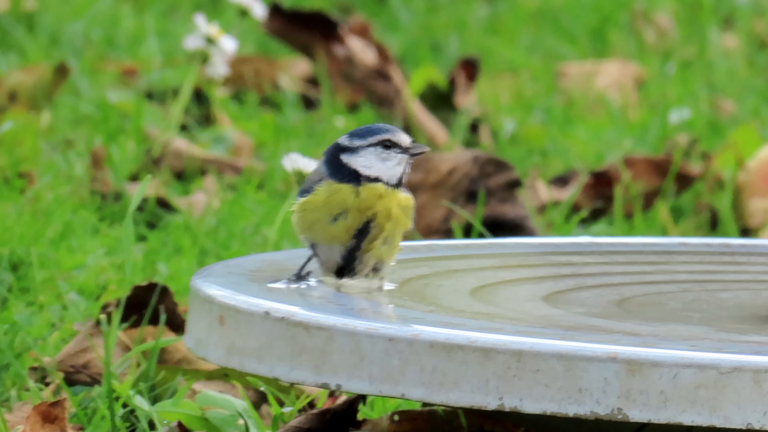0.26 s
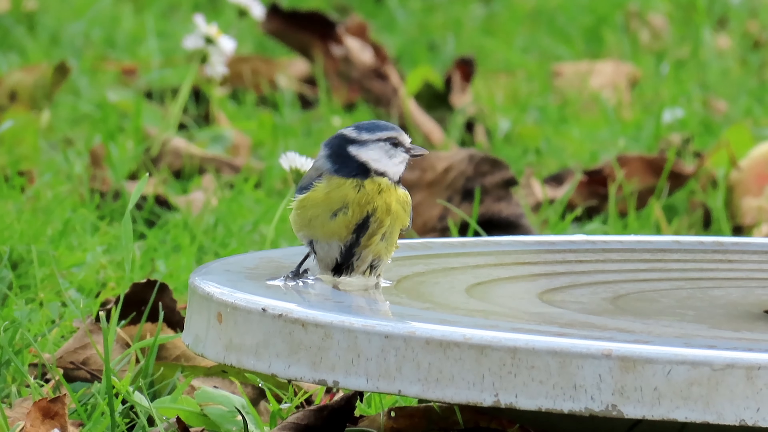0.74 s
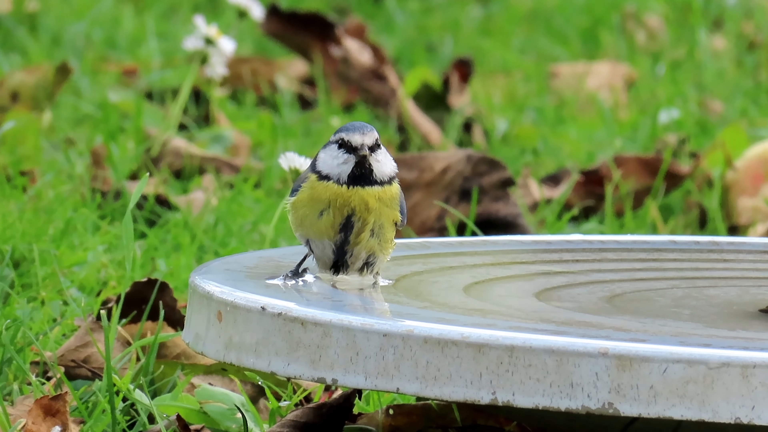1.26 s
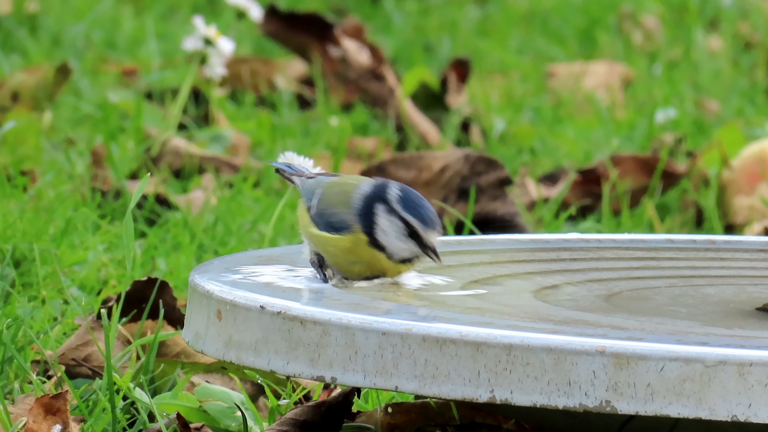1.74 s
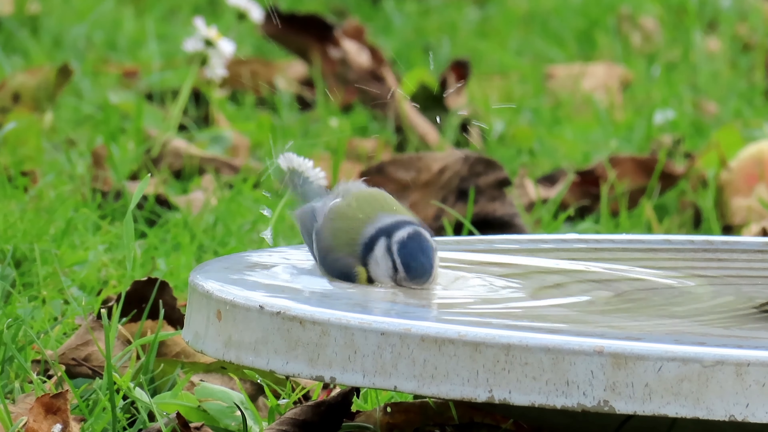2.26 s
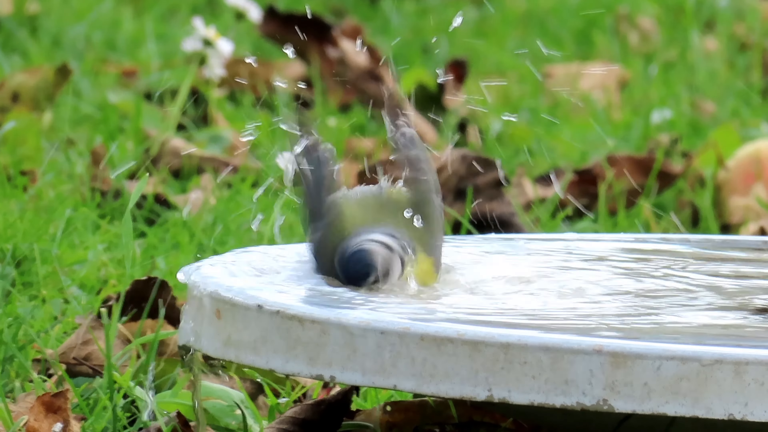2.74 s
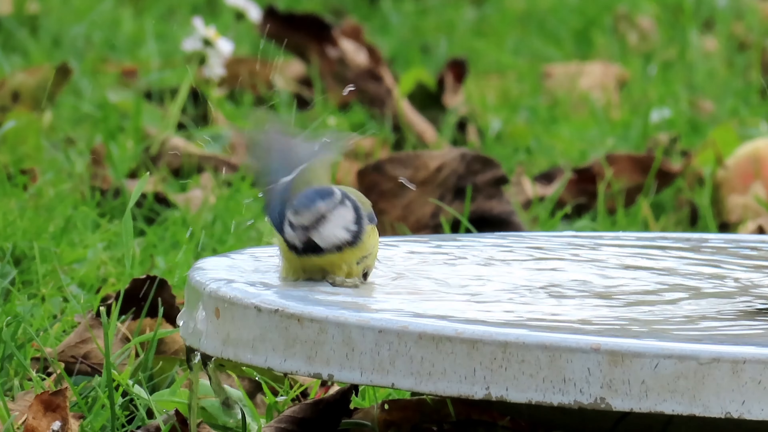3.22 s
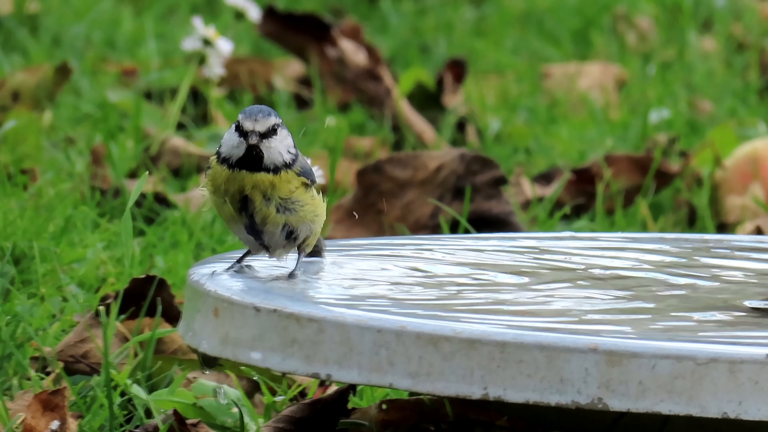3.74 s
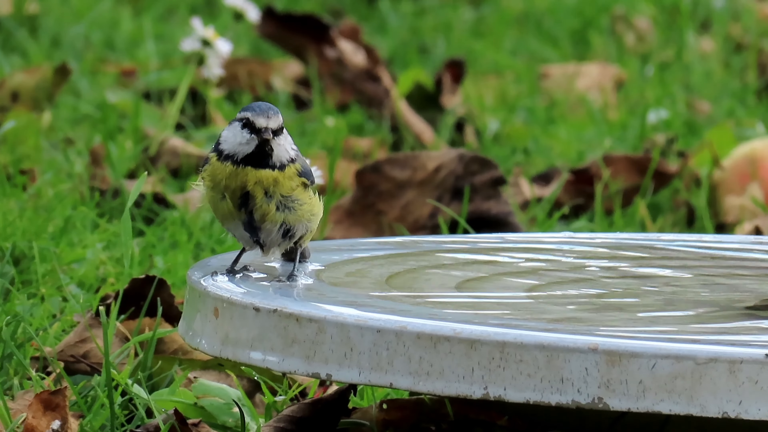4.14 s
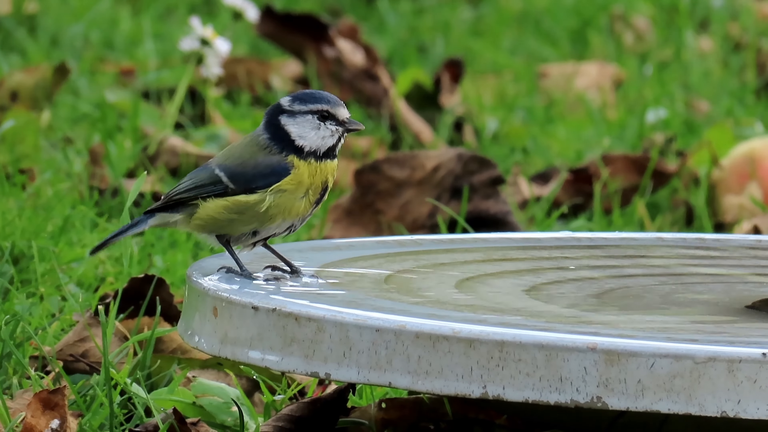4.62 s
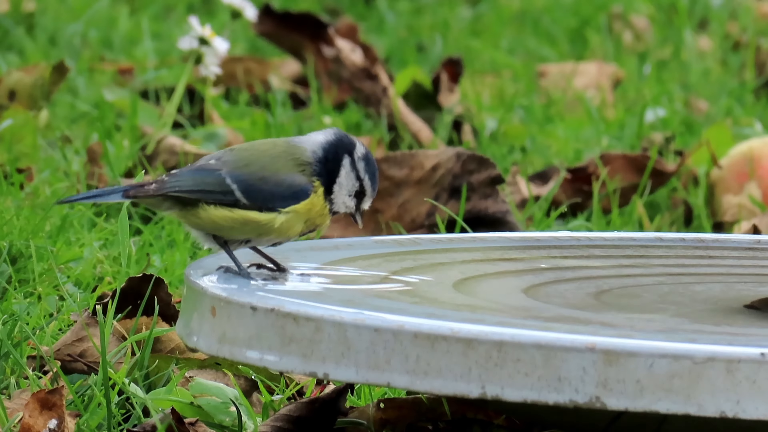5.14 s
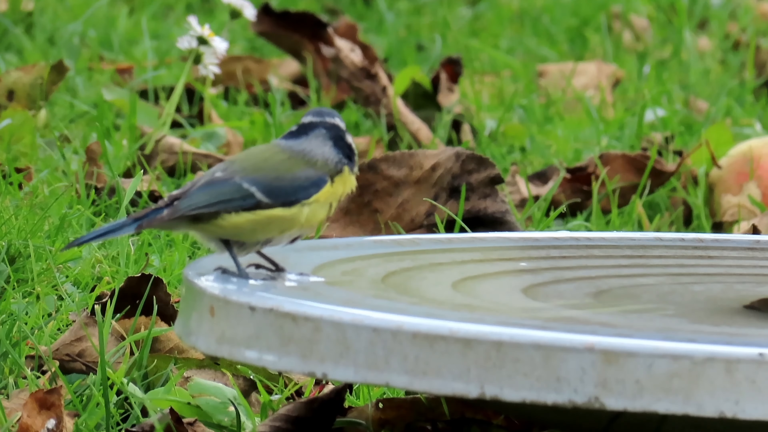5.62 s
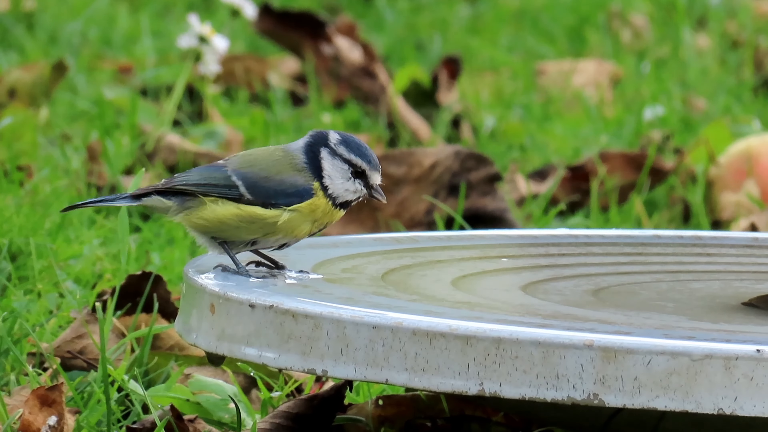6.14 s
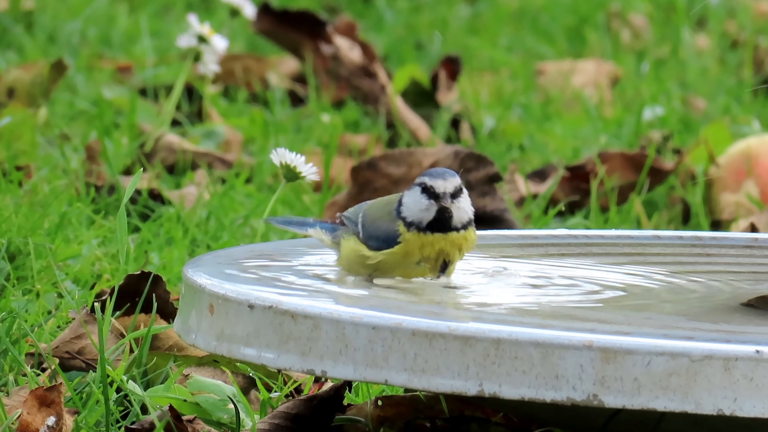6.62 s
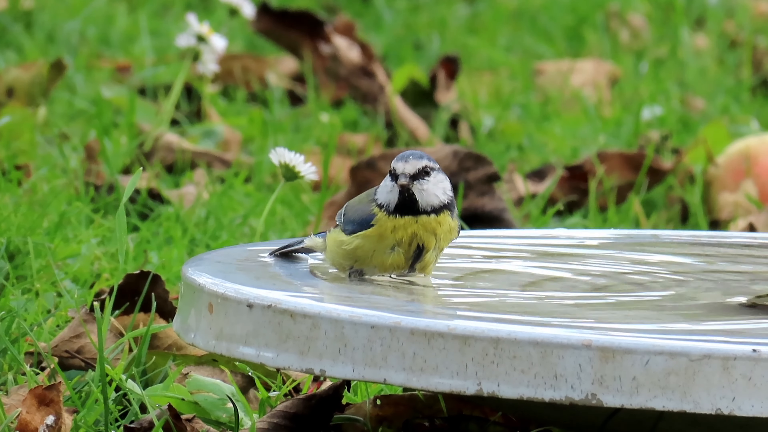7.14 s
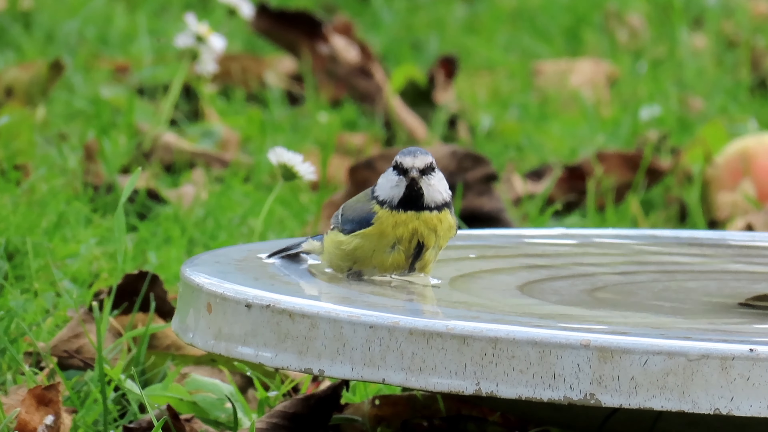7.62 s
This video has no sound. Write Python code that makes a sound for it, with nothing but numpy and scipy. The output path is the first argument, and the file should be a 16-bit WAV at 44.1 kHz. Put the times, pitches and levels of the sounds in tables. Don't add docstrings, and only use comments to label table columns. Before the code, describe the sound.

An outdoor garden with a quiet bed of air hiss, distant traffic and one wavering low engine note. From 0 to 0.7 seconds a small bird, very close and centred, finishes a song with five sharp, high falling slides, each about a tenth of a second and stopping abruptly, with tiny dull beak clicks. Then the background is exposed, with faint hooked calls and peeps from other birds, slightly left and lightly echoing. At 2.9 and 3.2 come two quavering whistles, much quieter, then seven falling slides from 3.4 to 4.5, with two hedge calls among them. A lull follows, with faint peeps near 5.6 to 6. At 6.7 and 6.9 two loud trembling whistles return, the second stronger and overloaded, then five slides from 7.2 to the end, with beak clicks between and a clear hooked call near 7.75.

```python
import sys
import numpy as np
from scipy import signal
from scipy.fft import rfft, irfft, next_fast_len
from scipy.io import wavfile
from scipy.ndimage import uniform_filter1d, map_coordinates

SR = 44100
rng = np.random.default_rng(int(sys.argv[2]) if len(sys.argv) > 2 else 0)


def unload_wav(signal):
    wavfile.write(
        sys.argv[1],
        SR,
        np.round(np.clip(np.atleast_2d(signal).T, -1, 1) * 32767).astype(np.int16),
    )


def to_linear_factor(level_db):
    exponent = np.asarray(level_db, float) / 20
    return 10 ** exponent


N = 347067


def unit(x):
    return x / np.sqrt(np.mean(x ** 2) + 1e-20)


def along(points, hz):
    f, v = np.transpose(points)
    return np.interp(np.log(hz + 1), np.log(f + 1), v)


def curve(rows):
    s, value = np.transpose(rows)
    return np.interp(np.arange(N) / SR, s, value)


def filtered(x, response):
    m = next_fast_len(x.shape[-1] + 8192)
    return irfft(rfft(x, m) * response(np.fft.rfftfreq(m, 1 / SR)), m)[..., :x.shape[-1]]


def add(track, start_s, hz, db, overtone_db=-90):
    phase = 2 * np.pi * np.cumsum(hz) / SR
    overtones = np.sin(2 * phase) + to_linear_factor(10.0) * np.sin(3 * phase)
    tone = to_linear_factor(db) * (np.sin(phase) + to_linear_factor(overtone_db) * overtones)
    at = round(start_s * SR) + np.arange(len(tone))
    inside = (at >= 0) & (at < N)
    track[at[inside]] += tone[inside]


def echoes(x, t60, delay_s):
    t = np.arange(SR // 2) / SR
    tail = rng.standard_normal((2, len(t))) * to_linear_factor(-60 * t / t60) * (t > delay_s)
    return signal.fftconvolve(x[None], tail / np.linalg.norm(tail[0]), axes=1)[:, :N]


# frequency in Hz, side level minus mid level in dB.
SIDE_LEVEL = [(60, -25), (110, -10), (200, -5.5), (380, 3.5), (700, -9), (1290, -5.5), (2380, -2),
              (4400, -4.5), (8120, -5.5), (15000, -3)]


def rush(spectrum, patchy_db):
    z = signal.stft(rng.standard_normal((2, N)), nperseg=512)[2]
    field = uniform_filter1d(rng.standard_normal(z.shape[1:]), size=6, axis=0)
    field = uniform_filter1d(field, size=14, axis=1)
    pair = signal.istft(z * to_linear_factor(patchy_db * unit(field)), nperseg=512)[1][:, :N]
    mid, side = filtered(pair, lambda hz: to_linear_factor(along(spectrum, hz) + [0 * hz, along(SIDE_LEVEL, hz)]))
    return np.array([mid + side, mid - side]) / np.std(mid)


# frequency in Hz, density in dB per Hz.
AIR = [(760, -19.5), (1300, -2), (2200, -6), (2710, -7.5), (5140, -12.5), (5590, -14), (8060, -18.5),
       (12000, -28), (13900, -27), (15900, -37)]


def air():
    return to_linear_factor(-49 + 1.34) * rush(AIR, patchy_db=0.74)


# frequency in Hz, density in dB per Hz.
RUMBLE = [(10, -43), (18, -18), (35, -7.5), (50, -5), (70, -6), (90, -12.5), (120, -26), (200, -120)]


def rumble():
    sway_db, sways_per_s = 1.5, 1.5
    t = np.arange(N) / SR
    sway = map_coordinates(rng.standard_normal(int(t[-1] * sways_per_s) + 4), [t * sways_per_s])
    return to_linear_factor(-46 + 2.5 + sway_db * sway) * rush(RUMBLE, patchy_db=0.5)


# frequency in Hz, density in dB per Hz.
ENGINES = [(53, -22), (90, -2.5), (146, -2), (188, -6.5), (273, -6), (310, -9.5), (364, -12), (516, -9.5),
           (600, -16), (780, -51), (1320, -120)]
# frequency in Hz, density in dB per Hz.
TYRES = [(350, -50), (600, -6), (813, 2.5), (1000, -6.5), (1100, -2.5), (1230, -12), (1600, -14),
         (2080, -22), (3520, -120)]


def traffic():
    traffic_db = -39
    engines = to_linear_factor(traffic_db - 1.5) * rush(ENGINES, patchy_db=1.12)
    return engines + to_linear_factor(traffic_db - 4.0) * rush(TYRES, patchy_db=1.2)


# time in seconds, level in dB.
DRONE = [(0, -41.5), (1, -41), (1.65, -51.5), (1.9, -44), (3.2, -43), (3.8, -40.5), (4.3, -51), (4.7, -45),
         (6.2, -42.5), (6.5, -49.5), (7.2, -52.5), (7.87, -39)]


def drone():
    start_hz, hz_per_s = 69.1, .75
    hz = start_hz + hz_per_s * np.arange(N) / SR
    return np.sqrt(2) * to_linear_factor(curve(DRONE)) * np.sin(2 * np.pi * np.cumsum(hz) / SR)


# start in seconds, top in Hz, low turn in Hz, end in Hz, level in dB.
HOOKS = [
    (.173, 8960, 8200, 9050, -50),
    (.746, 9000, 8050, 9100, -48.5),
    (1.346, 9100, 7600, 8440, -57),
    (1.744, 9200, 7220, 8960, -52.5),
    (2.149, 8800, 7000, 8400, -54),
    (2.39, 8500, 6940, 8400, -54.5),
    (3.44, 8600, 6720, 8330, -44),
    (3.772, 8600, 6740, 9000, -42.5),
    (7.745, 9200, 7480, 8830, -42),
]


def hooked_calls():
    rise_s, turn_s, climb_s, fade_s = 0.0069, .02, .052, 0.015
    scoop_hz, edge_db, rasp_depth_hz = 800, 19, 110
    calls = np.zeros(N)
    t = np.arange(0, turn_s + climb_s, 1 / SR)
    lost = np.clip(1 - t / rise_s, 0, 1) + np.clip(1 - (t[-1] - t) / fade_s, 0, 1) ** 2
    dive_db = -4 * np.clip(2 - 2 * t / turn_s, 0, 1)
    for s, top_hz, low_hz, end_hz, db in HOOKS:
        hz = np.interp(t, [0, rise_s, turn_s], [top_hz - scoop_hz, top_hz, low_hz])
        hz = hz + (end_hz - low_hz) * np.clip((t - turn_s) / climb_s, 0, 1) ** 1.4
        rasp_hz = rasp_depth_hz * unit(signal.resample(rng.standard_normal(30), len(t)))
        add(calls, s, uniform_filter1d(hz, size=220) + rasp_hz, db - edge_db * lost + dive_db)
    return calls


# start in seconds, length in seconds, start in Hz, end in Hz, level in dB.
PEEPS = [(2.763, .2, 8420, 7650, -62), (5.58, .052, 9000, 6450, -64), (5.63, .026, 6430, 6400, -56),
         (5.868, .035, 4950, 4950, -59), (5.81, .045, 8100, 7400, -66), (4.398, .04, 4800, 4850, -58),
         (6.775, .025, 9000, 8000, -56), (1.35, .012, 10250, 10250, -64), (1.37, .012, 10200, 10200, -65),
         (1.39, .012, 10250, 10250, -64), (1.53, .015, 8400, 8400, -63), (1.885, .015, 10200, 10200, -67),
         (4.98, .04, 6950, 7050, -63), (5.973, .01, 9100, 9100, -61), (.49, .03, 7800, 7900, -62)]


def small_peeps():
    glide_ease = 1.5
    peeps = np.zeros(N)
    share = lambda length: np.arange(round(length * SR)) / (length * SR)
    swell_db = lambda u: np.interp(u, [0, .1, .9, 1], [-7, 2.5, 4.5, -15])
    for s, length, start_hz, end_hz, db in PEEPS:
        u = share(length)
        add(peeps, s, end_hz + (start_hz - end_hz) * (1 - u) ** glide_ease, db + swell_db(u))
    u = share(.102)
    arch_hz = np.polyval(np.polyfit([0, .5, 1], [4720, 5540, 5100], deg=2), u)
    add(peeps, 5.765, arch_hz, -57.5 + swell_db(u))
    return peeps


def hedge():
    calls, peeps = hooked_calls(), small_peeps()
    lead_s = 3e-5
    ports = np.array([[1], [-1]])
    direct = filtered((calls + peeps)[None], lambda hz: np.exp(1j * np.pi * hz * lead_s * ports))
    wet = to_linear_factor(-3.5) * echoes(calls + to_linear_factor(-6) * peeps, t60=.22, delay_s=.004)
    twinkle = map_coordinates(rng.standard_normal(N // 180 + 4), [np.arange(N) / 180])
    direct = direct * to_linear_factor(3.2 * twinkle)
    return to_linear_factor([[4.2], [1.8]]) * (direct + wet)


# time in seconds, peak level in dB, tilt in dB per kHz.
BEAK = [
    (0.5122, -35, -6),
    (0.5644, -39, -5),
    (0.603, -42, -8),
    (0.6674, -43, 0),
    (6.8563, -42, -2),
    (7.1278, -31.5, -12),
    (7.4685, -36, 2),
    (7.6236, -41, 0),
]


def beak():
    centre_hz, centre_s = 2600, .007
    out, t = np.zeros(N + SR), np.arange(SR // 20) / SR
    for s, db, tilt_db in BEAK:
        band = lambda hz: np.exp(-((hz - centre_hz) / 680) ** 4) * to_linear_factor(tilt_db * (hz - centre_hz) / 1000)
        puff = unit(filtered(rng.standard_normal(len(t)), band))
        out[round(s * SR):][:len(t)] += to_linear_factor(db - 7) * np.exp(-((t - centre_s) / .007) ** 2) * puff
    return out[:N]


STOP_S = 0.0047


def edges_db(t):
    onset_s, edge_db = 0.0028, 24
    return -edge_db * (np.clip(1 - t / onset_s, 0, 1) + np.clip(1 - (t[-1] - t) / STOP_S, 0, 1))


# start in seconds, end in seconds, shelf in Hz, pitch the fall heads for in Hz,
# effort in dB over the overload point.
SLIDES = [(-.048, 0.049, 5880, 4986, 3), (0.101, 0.1983, 5900, 4980, 4.5), (.249, 0.35, 5930, 4905, 3),
          (0.406, .5044, 5880, 4950, 3), (.567, 0.665, 5940, 4970, 3), (3.424, 3.529, 6080, 5020, -1.5),
          (3.581, 3.682, 5910, 4970, 2), (3.733, 3.8271, 5900, 4950, 4), (3.883, 3.986, 5900, 4935, 6),
          (4.047, 4.146, 5850, 4950, 5), (4.206, 4.303, 5920, 4930, 3), (4.371, 4.4642, 5900, 4960, 3),
          (7.199, 7.3073, 6150, 5040, -3), (7.361, 7.4635, 5960, 4935, 1.5), (7.514, 7.621, 5920, 4980, 3),
          (7.676, 7.7734, 5815, 4910, 3), (7.834, 7.934, 5880, 4920, 3.5)]


def slides(voice):
    shelf_s, shelf_sag_hz, fall_s = .025, 151, .036
    soft_db, swell_s = 26, 0.017
    last_dip_hz, last_dip_s = 50, .009
    waver_hz, waver_db = 14, .9
    for start, end, shelf_hz, rest_hz, db in SLIDES:
        t = np.arange(0, end - start + STOP_S / 2, 1 / SR)
        falling = np.maximum(t - shelf_s, 0)
        hz = rest_hz + (shelf_hz - rest_hz) * np.exp(-falling / fall_s)
        hz = hz + shelf_sag_hz * np.clip(1 - t / shelf_s, 0, 1) ** 2
        hz = hz - last_dip_hz * np.exp((t - t[-1]) / last_dip_s)
        waver = signal.resample(rng.standard_normal((2, 9)), len(t), axis=1)
        hz, db = hz + waver_hz * waver[0], db + waver_db * waver[1]
        level_db = db - soft_db * np.exp(-t / swell_s) + edges_db(t)
        add(voice, start, uniform_filter1d(hz, size=150), level_db, overtone_db=-40 - 1.2 * db)


# start in seconds, end in seconds, start in Hz, crest in Hz,
# level in dB over the overload point.
WHISTLES = [
    (2.886, 3.056, 6950, 7570, -6.5),
    (3.159, 3.341, 7020, 7390, 2.5),
    (6.676, 6.853, 6700, 7436, -5),
    (6.937, 7.123, 6880, 7375, 3.5),
]
# first in seconds, last in seconds,
# full depth in Hz, level change in dB on the way down, level change in dB on the way up.
QUAVERS = [
    (2.929, 3.05, 930, 3, -4),
    (3.181, 3.338, 700, 0, -6),
    (6.7329, 6.855, 820, 3, -5),
    (6.974, 7.1166, 830, -4, -8),
]


def whistles(voice):
    crest_s, crest_sag_hz_per_s = .095, 800
    soft_db_per_khz, swell_s = 52, .018
    quaver_s, drop_width_s = .0172, .0033
    hurry_s, lead_s = .0018, .0006
    first_depth, deepens_in = .24, 2.6
    for whistle, quavers in zip(WHISTLES, QUAVERS):
        start, end, start_hz, crest_hz, db = whistle
        first, last, depth_hz, down_db, up_db = quavers
        t = np.arange(0, end - start + STOP_S / 2, 1 / SR)
        climb_hz = crest_hz - start_hz
        ridge_hz = crest_hz - climb_hz * np.clip(1 - t / crest_s, 0, 1) ** 2
        ridge_hz = ridge_hz - crest_sag_hz_per_s * np.maximum(t - crest_s, 0)
        level_db = db - soft_db_per_khz * climb_hz / 1000 * np.exp(-t / swell_s) + edges_db(t)
        k = np.arange(round((last - first) / quaver_s) + 1)[:, None]
        u = k / k.max()
        at = first - start + (last - first) * u
        at = at - hurry_s * np.sin(2 * np.pi * u) - lead_s * np.sin(np.pi * u)
        depth = np.tanh(first_depth + k / deepens_in)
        bump = lambda late_s, width: (depth * np.exp(-((t - at - late_s) / width) ** 2)).sum(axis=0)
        swell_db = down_db * bump(-.003, .0026) + up_db * bump(.002, .0026)
        add(voice, start, ridge_hz - depth_hz * bump(0, drop_width_s), level_db + swell_db)


def singer():
    voice = np.zeros(N)
    slides(voice)
    whistles(voice)
    return voice


# frequency in Hz, gain in dB.
MICROPHONE = [(6000, 0), (9000, -.5), (15500, -2.5)]
# time in seconds, gain in dB.
FADER = [
    (0, -21.7),
    (1.5, -21.7),
    (2.5, -40.7),
    (5, -40.7),
    (6.3, -21.8),
]


def near_microphone(voice):
    wall = np.pad(voice, (round(.017 * SR), 0))[:N]
    heard = voice + to_linear_factor(-30) * wall + to_linear_factor(-28.5) * echoes(voice, t60=.4, delay_s=.004)[0]
    heard = heard + to_linear_factor(-52) * rng.standard_normal(N)
    top, hardness = .87, 30.0
    clipped = top * heard / (top ** hardness + np.abs(heard) ** hardness) ** (1 / hardness)
    haze = to_linear_factor(-27) * (heard - clipped) * rng.standard_normal(N)
    return to_linear_factor(curve(FADER)) * filtered(clipped + haze, lambda hz: to_linear_factor(along(MICROPHONE, hz)))


def scene():
    background = air() + rumble() + traffic() + drone()
    return background + hedge() + beak() + near_microphone(singer())


def band_limit(x):
    return signal.sosfilt(signal.butter(12, 16090, fs=SR, output="sos"), x)


def record(dry):
    top_hz, offset = 15830, .0014
    mix = filtered(dry, lambda hz: hz < top_hz) + offset
    return band_limit(mix)


dry = scene()
out = record(dry)
unload_wav(out)
```